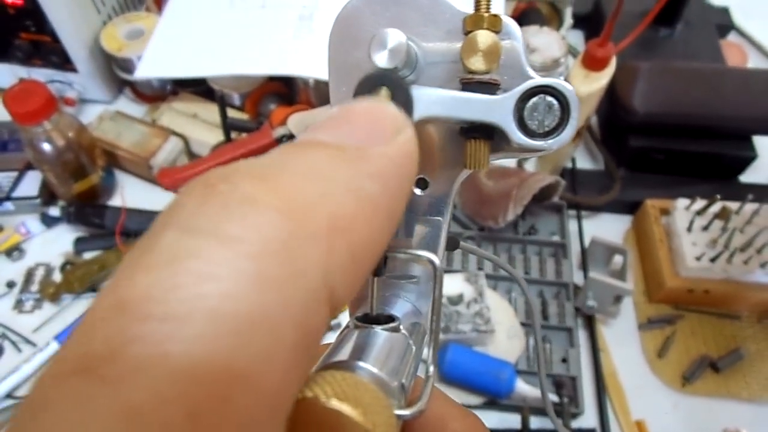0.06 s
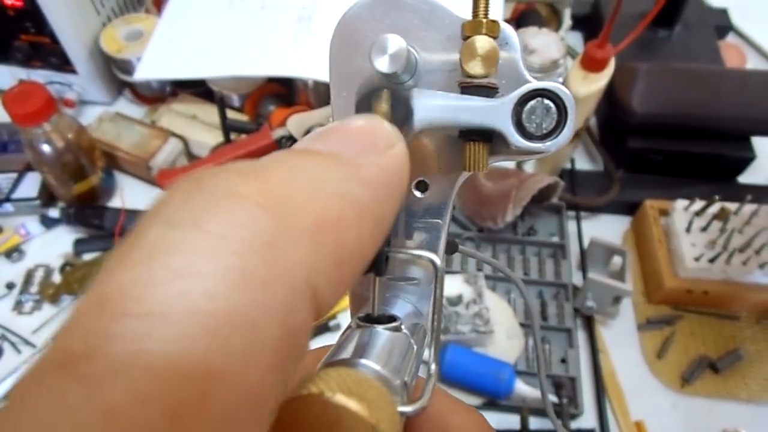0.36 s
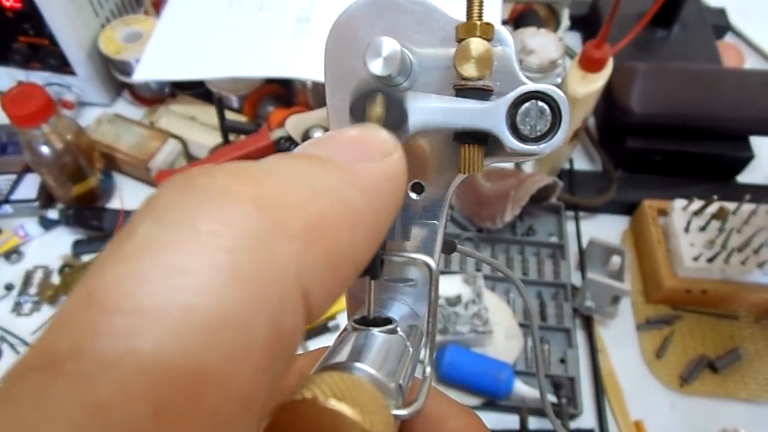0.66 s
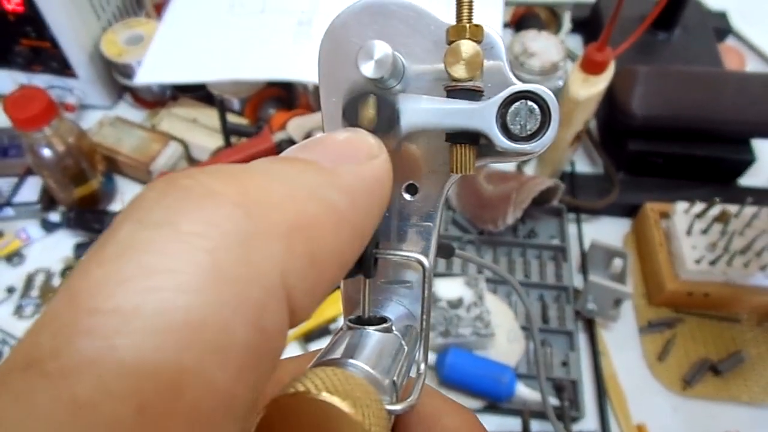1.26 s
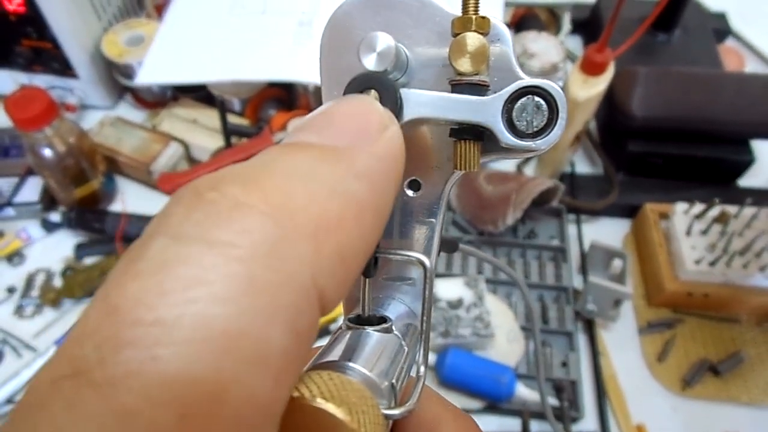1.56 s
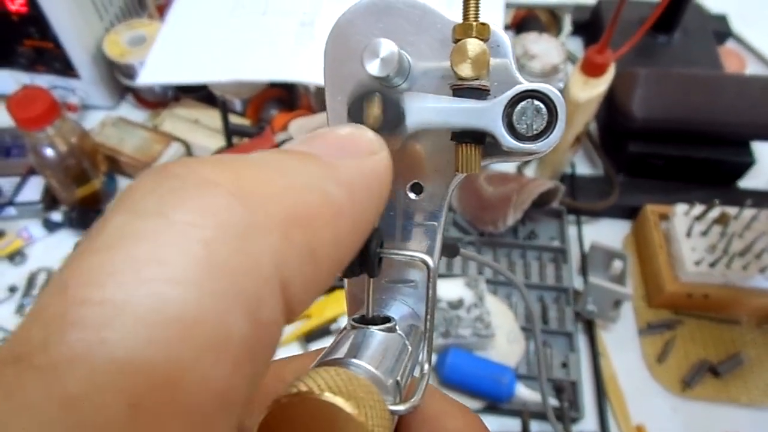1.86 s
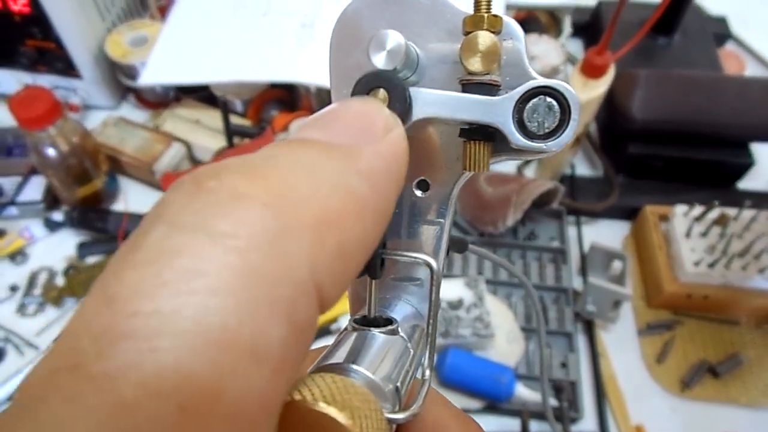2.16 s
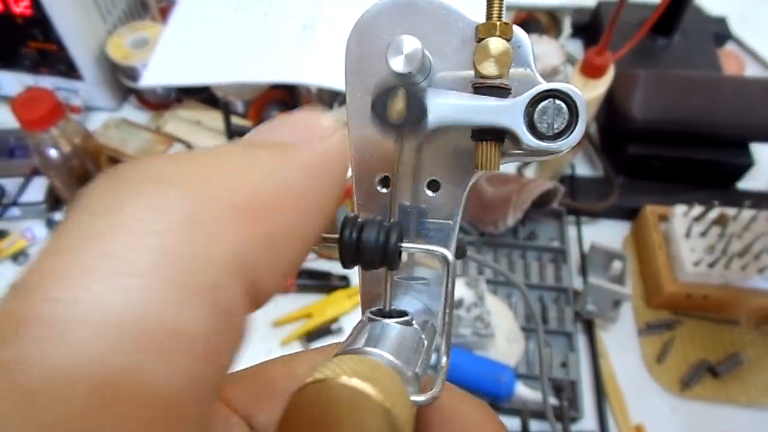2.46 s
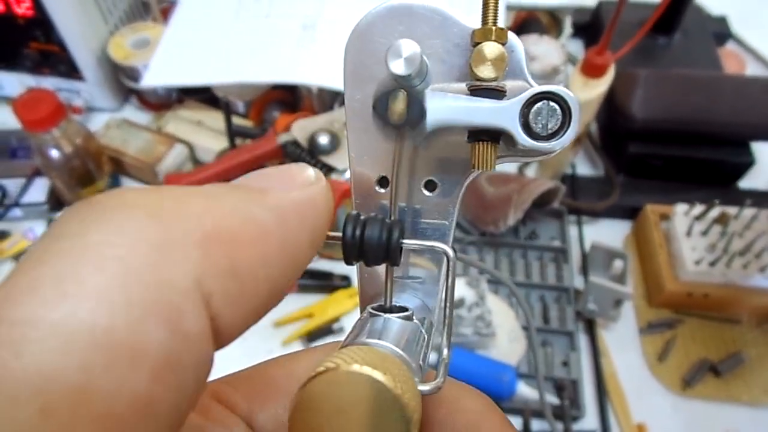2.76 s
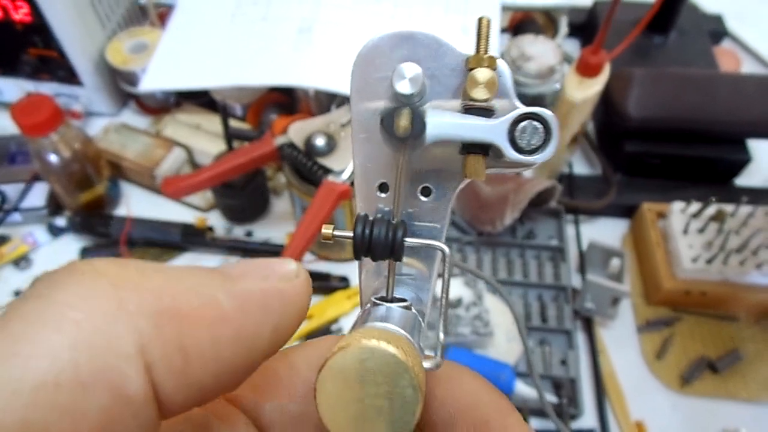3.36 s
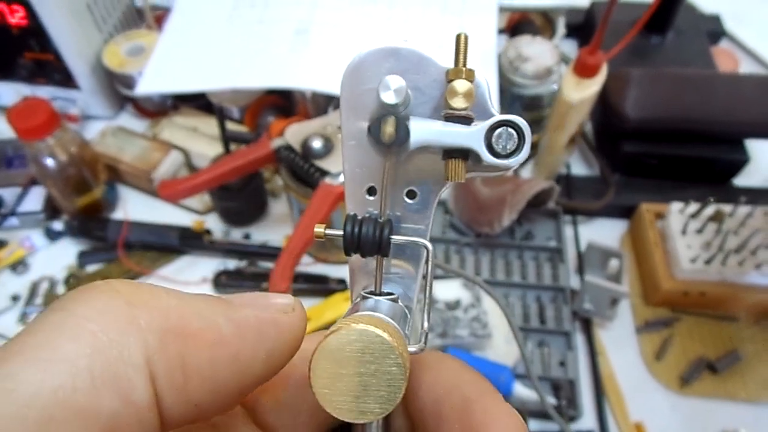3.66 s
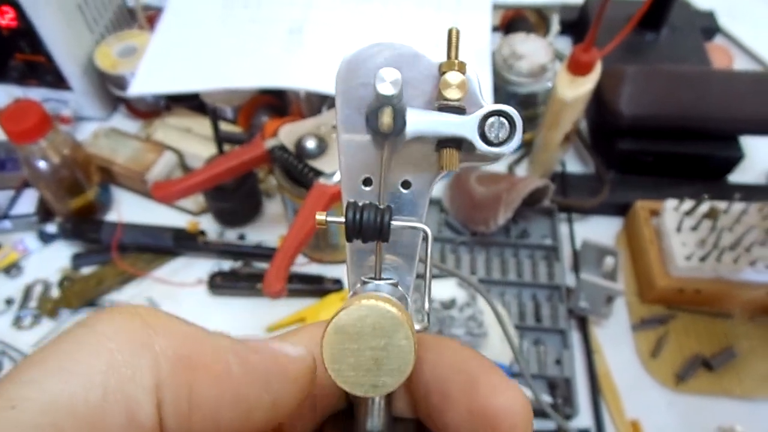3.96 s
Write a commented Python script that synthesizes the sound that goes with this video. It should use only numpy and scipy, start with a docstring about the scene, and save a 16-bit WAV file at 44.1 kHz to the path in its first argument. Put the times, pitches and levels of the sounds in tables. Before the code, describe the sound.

A small tattoo machine buzzes and rattles, tapping harder and faster four times.

```python
"""Tattoo machine over a workbench

A rotary tattoo machine runs close by. Each turn of the motor knocks the loose linkage several times
and rings the metal frame. Four times a thumb presses on the arm, which then taps hard once a turn
while the motor speeds up. The motor's brushes hiss; a fan and faint electrical tones hum behind."""
import sys
import numpy as np
from scipy import signal
from scipy.fft import rfft, irfft
from scipy.io import wavfile

SR = 44100
rng = np.random.default_rng(int(sys.argv[2]) if len(sys.argv) > 2 else 0)


def to_wav(sig):
    """Store sig (one row per channel, or 1-D mono) as 16-bit WAV at the path in sys.argv[1].

    Samples outside -1..1 are clipped; the rate is SR.
    """
    pcm = np.clip(np.atleast_2d(sig), -1, 1) * 32767
    pcm = np.round(pcm).astype(np.int16)
    wavfile.write(sys.argv[1], SR, pcm.T)  # frames by channels


N = 176400
IDLE_HZ = 83.05  # motor turns per second with no thumb on the arm


def undb(db):
    """Turn decibels into a plain multiplier."""
    return 10 ** (np.asarray(db) / 20)


def level(x, db):
    """Scale a sound to an average (RMS) level."""
    return x * undb(db) / np.sqrt(np.mean(x ** 2))


def smooth(x, seconds):
    """Follow a signal with a lag, rounding off sudden changes."""
    a = np.exp(-1 / (seconds * SR))
    return signal.lfilter([1 - a], [1, -a], x)


def drift(rate_hz):
    """Random wandering of typical size 1, with little motion faster than the given rate."""
    hz = np.arange(N // 2 + 1) * SR / N
    return level(irfft(rfft(rng.standard_normal(N)) * np.exp(-(hz / rate_hz) ** 2), N), 0)


def colour(x, points, resonances=()):
    """Filter a sound with a broad tone curve plus ringing peaks."""
    f = np.maximum(np.arange(N + 1) * SR / (2 * N), 1)
    hz, db = np.array(points).T
    power = undb(np.interp(np.log(f), np.log(hz), db)) ** 2
    for centre, width, peak_db in resonances:
        power += (undb(peak_db) / (1 + (2 * (f - centre) / width) ** 2)) ** 2
    # build the filter so that it rings after a hit, never before
    cepstrum = irfft(np.log(power) / 2)[:N]
    cepstrum[1:] *= 2
    return irfft(rfft(x, 2 * N) * np.exp(rfft(cepstrum, 2 * N)))[:N]


def clicks(times, sizes):
    """Sharp clicks at the given times, even between samples."""
    at = times[:, None] * SR
    nearby = np.floor(at).astype(int) + np.arange(-3, 5)
    inside = (nearby >= 0) & (nearby < N)
    return np.bincount(nearby[inside], (sizes[:, None] * np.sinc(nearby - at))[inside], N)


def grit(per_s):
    """Many tiny contacts at random moments."""
    return (rng.random(N) < per_s / SR) * rng.standard_normal(N)


def blows(times, sizes, jitter_s, scatter_db, bounce_db, bounce_s=.0014, scrape_s=.012):
    """Uneven metal hits, each followed by a bounce and a brief scrape."""
    late, strength, delay, rebound = rng.standard_normal((400, 4))[:len(times)].T
    times = times + jitter_s * late
    sizes = sizes * undb(scatter_db * np.clip(strength, -2, 1.3))
    bounce_times = times + bounce_s * np.exp(.5 * delay)
    bounce_sizes = sizes * np.tanh(2 * rebound) * undb(bounce_db)
    hits = clicks(times, sizes) + clicks(bounce_times, bounce_sizes)
    fade = np.sqrt(smooth(hits ** 2, scrape_s / (2 * np.log(1000))))  # falls 60 dB in scrape_s
    return hits + undb(-4) * fade * rng.standard_normal(N)


# tone curve of the fan's rushing air (frequency [Hz], relative level [dB])
FAN_COLOUR = [(20, -19.5), (45, -16.5), (110, -14.5), (215, -16.5), (245, -6), (290, -6.5), (335, -2),
              (385, -6.5), (490, -8.5), (555, -24), (800, -19.5), (950, -20), (2000, -32), (8000, -36)]
# ringing peaks of the fan's housing (frequency [Hz], width [Hz], relative level [dB])
HOUSING_PEAKS = [(419.6, 38, 3), (476, 28, -2), (532, 42, -8.5), (577.5, 9.1, -5.5), (608.7, 23, -6.5),
                 (662, 20, -9), (754, 57, -8.5), (824, 53, -12.5)]
def fan():
    """A fan's rushing air drones in its housing."""
    return level(colour(rng.standard_normal(N), FAN_COLOUR, HOUSING_PEAKS), -43.5)


# tone curve of the room's background noise (frequency [Hz], relative level [dB])
AIR_COLOUR = [(20, 3), (85, 5.5), (200, 4), (420, 4), (800, -1), (1400, 0), (2200, -81), (6000, -43)]
def room_air():
    """Low room noise, opposite in the left and right channels so that it sounds wide."""
    air = level(colour(rng.standard_normal(N), AIR_COLOUR), -59)
    return air * np.array([[1], [-1]])


# steady electrical tones (frequency [Hz], level [dB])
HUM_TONES = [(49, -65), (59, -68), (409.3, -53), (413.1, -54.5), (467.5, -55.5), (1872, -65), (2105, -61.5),
             (7768, -59.5), (9848, -73), (10180, -75)]
def electrical_hum(t):
    """Faint tones waver slightly; two lie so close in pitch that they throb."""
    return sum(undb(db) * np.sqrt(2) * np.sin(2 * np.pi * hz * t + .79 * drift(3.5))
               for hz, db in HUM_TONES)


# tone curve of the brushes' hiss (frequency [Hz], relative level [dB])
HISS_COLOUR = [(8000, -19), (10300, -6), (11300, -20), (12000, -10), (12450, 2), (13000, 4), (14000, 1)]
# breathy whistles of the brushes (frequency at idle [Hz], width [Hz], level on the right [dB])
BRUSH_WHISTLES = [(13800, 220, -55), (13740, 30, -59)]
def brushes(t, turns, force):
    """The brushes hiss; their whistle rises with speed and their sizzle ebbs under the thumb."""
    hiss = level(colour(grit(per_s=5000), HISS_COLOUR), -48)
    extra_cycles = 35 * (turns - IDLE_HZ * t)  # 35 Hz higher for each extra turn per second
    whistle = sum(level(drift(width) * np.sin(2 * np.pi * (hz * t + extra_cycles)), db)
                  for hz, width, db in BRUSH_WHISTLES)
    sizzle = level(drift(790) * np.sin(2 * np.pi * 11470 * t), -53.5) * undb(-10 * force)
    pulse = 1 + .16 * np.cos(2 * np.pi * turns)  # swells once a turn
    mostly_right = np.array([[undb(-12.5)], [1]])
    return (hiss + whistle + sizzle) * pulse * mostly_right


# tone curve of the rotor's whirr (frequency [Hz], relative level [dB])
ROTOR_COLOUR = [(200, -22), (600, -8.5), (1200, 2.5), (1800, 2), (2600, -2), (6000, -5), (12000, -13)]
def rotor():
    """The spinning part of the motor makes a steady rush."""
    return level(colour(rng.standard_normal(N), ROTOR_COLOUR), -50)


# loudness of the thin high ring (time [s], level [dB])
RING_LEVELS = [(0, -54.5), (2.4, -54), (2.9, -53.5), (3.4, -54), (4, -54)]
def high_ring(t, rattle, pitch_hz=7452, width_hz=220):
    """The rattle shakes up a thin high ring whose loudness wanders a little."""
    ring = colour(rattle, [(100, -60), (14000, -60)], [(pitch_hz, width_hz, 0)])
    loudness_db = np.interp(t, *np.array(RING_LEVELS).T) + 2 * drift(6.4)
    return level(ring, 0) * undb(loudness_db)


# presses of the thumb (start [s], end [s], relative tap level [dB])
THUMB_PRESSES = [(0.069, .39, 0), (0.849, 1.052, -1), (1.497, 1.728, 0), (2.102, 2.421, -0.5)]
def thumb(t, attack_s=.15, release_s=.072, speed_up_hz=12, inertia_s=.145):
    """The thumb's force on the arm, and the motor speed that climbs with a lag during each press."""
    force, held = np.zeros(N), np.zeros(N)
    for start, end, db in THUMB_PRESSES:
        push = np.clip((t - start) / attack_s + .35, 0, 1)
        let_go = np.clip((end - t) / release_s + .5, 0, 1)
        force += undb(db) * push * let_go
        held += (t > start) & (t < end)
    speed_hz = IDLE_HZ + speed_up_hz * smooth(held, inertia_s) + .1465 * drift(6.02)
    return force, speed_hz


def turn_times(t, turns, share):
    """The moments when the motor is a given share of the way through each turn."""
    return np.interp(np.arange(int(turns[-1])) + share, turns, t)


# knocks within one turn of the motor (position [share of a turn], relative level [dB])
TURN_KNOCKS = [(0, 4.5), (.07, 2.5), (0.191, -9.5), (0.378, -5), (0.538, 1.5), (0.778, -6)]
# tone curve of the knocks (frequency [Hz], boost [dB])
KNOCK_COLOUR = [(500, -1), (1500, -4), (2500, 4.5), (3100, 2.5), (5300, 0), (7000, -0.5), (13000, 0)]
# tone curve of the fine chatter (frequency [Hz], boost [dB])
CHATTER_COLOUR = [(500, 1.5), (1700, 6.5), (2400, 5.5), (3100, 1), (5300, 0), (7000, 0.5), (13000, 0.5)]
# slow changes in the rattle's loudness (time [s], boost [dB])
RATTLE_LEVELS = [(0, -1), (.7, 0.1), (1.3, 0.1), (1.9, -0.5), (2.55, 0), (2.9, -0.5), (3.3, -0.55), (4, -1)]
def linkage(t, turns, force):
    """The loose linkage knocks several times a turn, with fine chatter that grows under the thumb."""
    knocks = sum(blows(turn_times(t, turns, share), undb(db),
                       jitter_s=.00014, scatter_db=3.86, bounce_db=-5) for share, db in TURN_KNOCKS)
    chatter = level(grit(per_s=3000), -40.5) * undb(2.5 * force)
    rattle = colour(level(knocks, -38.5), KNOCK_COLOUR) + colour(chatter, CHATTER_COLOUR)
    return rattle * undb(np.interp(t, *np.array(RATTLE_LEVELS).T))


# tone curve of the arm's taps (frequency [Hz], boost [dB])
TAP_COLOUR = [(500, 7), (2300, -16), (2750, -6.5), (3030, 0.5), (3400, 1), (4000, 0), (5200, 2.5),
              (7000, -9), (13000, 2)]
def arm_taps(t, turns, force):
    """The pressed arm taps once a turn, harder the more the thumb pushes."""
    times = turn_times(t, turns, 0)
    taps = blows(times, np.interp(times, t, force), jitter_s=.00005, scatter_db=2, bounce_db=-14)
    average_force = np.sqrt(np.mean(force ** 2))
    return colour(level(taps, -34) * average_force, TAP_COLOUR)


# tone curve of the broad click under the ringing (frequency [Hz], relative level [dB])
CLICK_COLOUR = [(100, -46), (600, -32.5), (1200, -25.5), (2100, -14.5), (4000, -13), (6400, -18.5),
                (7000, -19.5), (10000, -24), (14000, -36.5)]
# ringing peaks of the metal frame and arm (frequency [Hz], width [Hz], relative level [dB])
FRAME_PEAKS = [(2595, 280, -9), (2993, 240, -5.5), (3480, 410, -5), (3896, 480, -3), (4450, 550, -3.5),
               (4930, 560, -2.5), (5195, 590, -1.5), (5366, 240, 1), (5504, 120, 0.5), (5970, 440, -11),
               (8520, 570, -17.5)]
def frame(hits):
    """Every hit rings the same metal frame, which changes the tone but keeps the overall level."""
    return level(colour(hits, CLICK_COLOUR, FRAME_PEAKS), 0) * np.std(hits)


def bench_echo(machine, fade_s=.032):
    """The workbench throws back a short blurred echo that falls 60 dB in fade_s."""
    t = np.arange(SR // 2) / SR
    echo = rng.standard_normal(len(t)) * np.exp(-np.log(1000) * t / fade_s)
    return undb(-8) * signal.fftconvolve(machine, echo / np.linalg.norm(echo))[:N]


def scene(left_lag_s=.000005):
    """The machine and its echo reach the right side just before the left; the room hums behind."""
    t = np.arange(N) / SR
    force, speed_hz = thumb(t)
    turns = np.cumsum(speed_hz) / SR
    rattle = frame(linkage(t, turns, force) + arm_taps(t, turns, force))
    machine = rattle + high_ring(t, rattle) + rotor()
    right = machine + bench_echo(machine)
    hz = np.arange(N // 2 + 1) * SR / N
    left = irfft(rfft(right) * np.exp(-2j * np.pi * hz * left_lag_s), N)
    return np.array([left, right]) + brushes(t, turns, force) + fan() + room_air() + electrical_hum(t)


def record(dry):
    """A steep filter cuts the highest treble, above 14250 Hz."""
    return signal.sosfilt(signal.ellip(12, .2, 80, 14250, fs=SR, output="sos"), dry)


dry = scene()
out = record(dry)
to_wav(out)
```